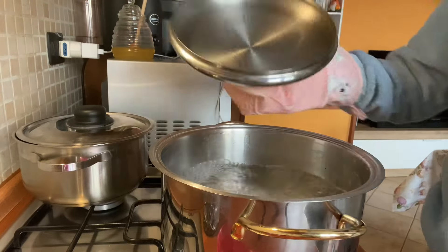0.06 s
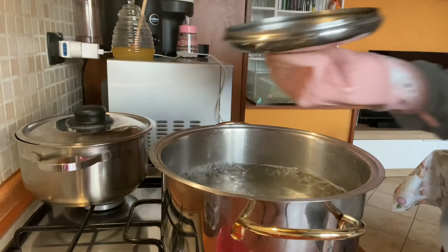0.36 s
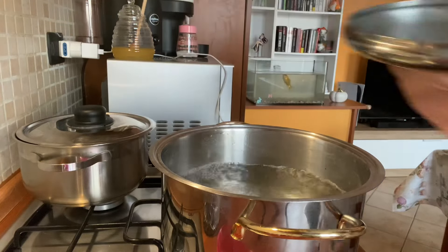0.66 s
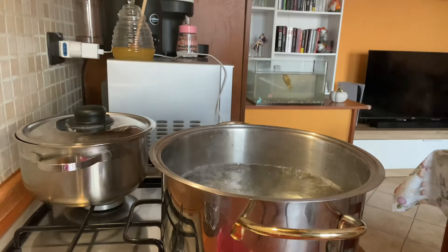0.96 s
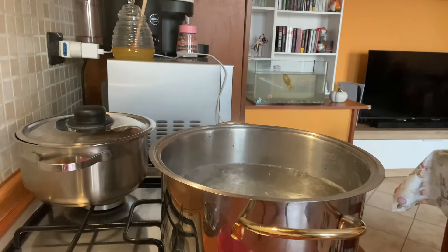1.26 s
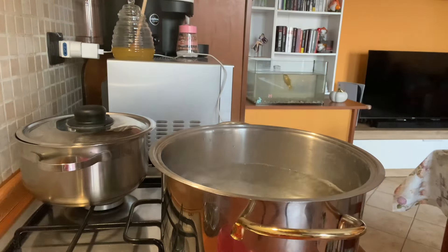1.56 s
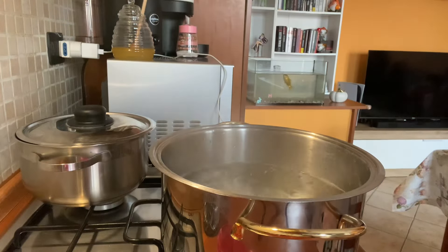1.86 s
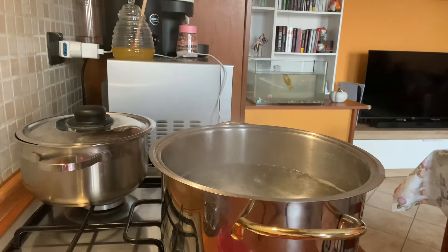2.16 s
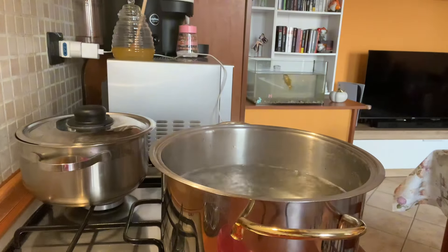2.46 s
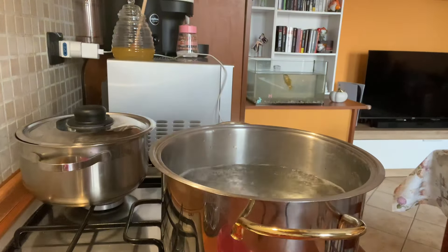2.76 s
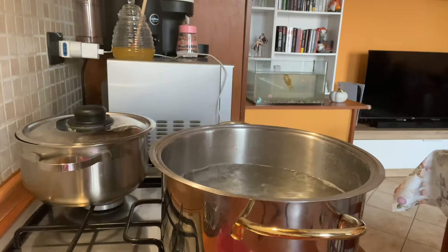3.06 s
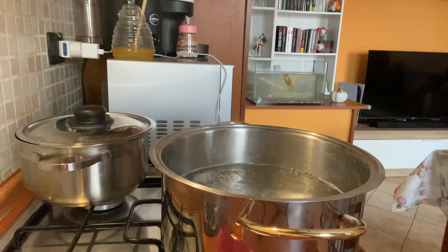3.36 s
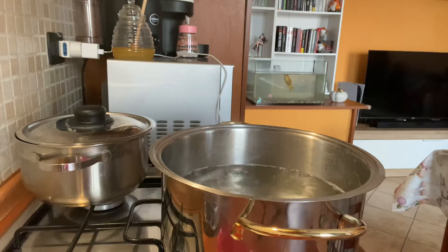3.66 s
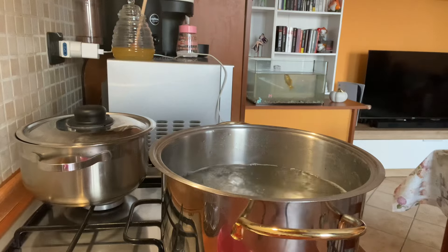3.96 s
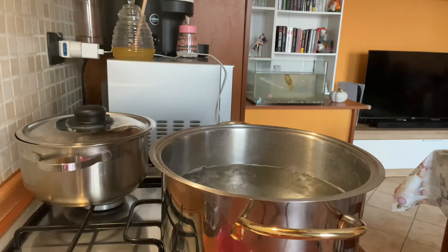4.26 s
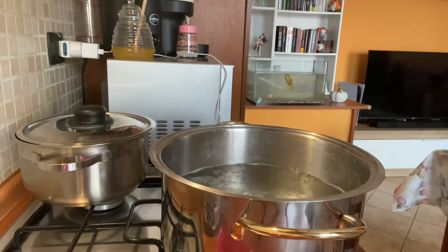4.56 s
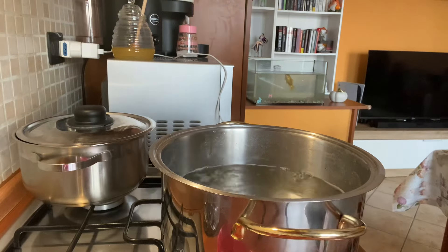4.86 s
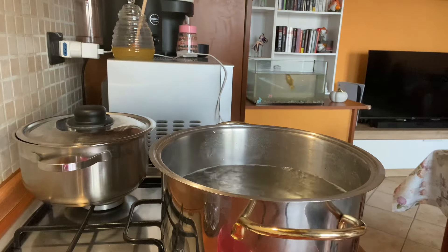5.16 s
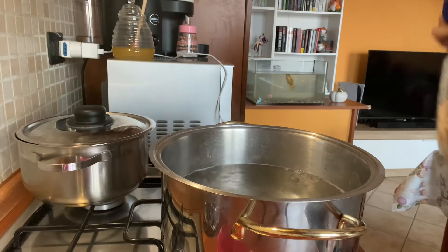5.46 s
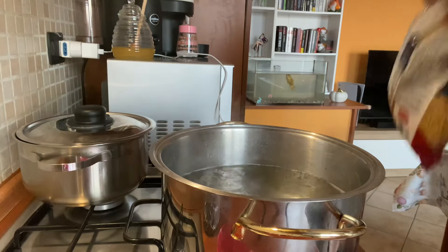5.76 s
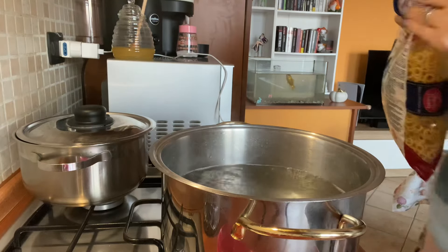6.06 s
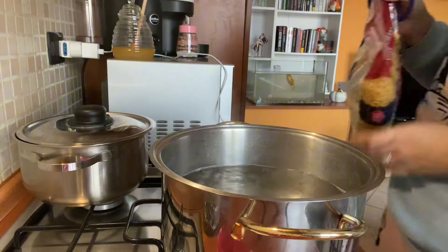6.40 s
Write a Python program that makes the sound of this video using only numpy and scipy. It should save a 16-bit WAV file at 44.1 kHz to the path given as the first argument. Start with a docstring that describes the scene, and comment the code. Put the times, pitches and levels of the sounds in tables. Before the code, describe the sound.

Close by, a metal pot lid clanks onto a kitchen counter, chatters on its rim and rings out. Several knocks and a light clink follow. Next comes the sharp crackle of a plastic bag being handled, with dry pasta shifting inside in hollow knocks and thumps. A gas flame hisses and flutters quietly throughout, heard in stereo, and the tiled room adds a short reverberation to the handling.

```python
"""First a gas burner, rumbling and hissing under a big pot, heard on a stereo microphone in a kitchen.
At 1.9 s a steel lid comes down on the counter: one clank, then it rattles flat and rings. A few things
are knocked about and the counter hums. From 3.6 s a plastic bag of dry pasta is picked up and carried
to the pot: its film crinkles and snaps, the pieces tumble inside, the air in the bag answers hollowly
and the load thumps. Tiled walls add a short reverberation to everything but the burner."""
import sys
import numpy as np
from scipy import signal
from scipy.fft import rfft, irfft, next_fast_len
from scipy.io import wavfile
from scipy.ndimage import uniform_filter1d, map_coordinates

SR = 44100
rng = np.random.default_rng(int(sys.argv[2]) if len(sys.argv) > 2 else 0)


def wav_out(sig):
    """Save sig, one row per channel (or a flat mono array), as 16-bit PCM at SR to the path in sys.argv[1]."""
    wavfile.write(sys.argv[1], SR, np.round(np.clip(np.atleast_2d(sig).T, -1, 1) * 32767).astype(np.int16))


N = 283563
TIME = np.arange(N) / SR


def amp(db):
    """Decibels to gain."""
    return 10 ** (np.asarray(db) / 20)


def unit(x):
    """Scale to rms 1."""
    return x / np.sqrt(np.mean(x ** 2) + 1e-20)


def along(points, hz):
    """Read (f/Hz, value) points on a log frequency axis."""
    freqs, values = np.transpose(points)
    return np.interp(np.log(hz + 1), np.log(freqs + 1), values)


def resonant(peaks):
    """Colour in dB of steep resonances given as (f/Hz, width/Hz, level/dB)."""
    return lambda hz: 20 * np.log10(sum(amp(db) / (1 + (2 * (hz - centre) / width) ** 4)
                                        for centre, width, db in peaks))


def wobble(rate):
    """A smooth random curve, rate knots a second."""
    return map_coordinates(rng.standard_normal(int(N * rate / SR) + 4), [TIME * rate])


def swell(t, start, hold, rise, fall):
    """Gain of a gesture: full from start for hold seconds, 20 dB per rise or fall time on either side."""
    return 10 ** (np.minimum(t - start, 0) / rise - np.maximum(t - start - hold, 0) / fall)


def filtered(x, response):
    """x times a response of frequency."""
    n = x.shape[-1]
    padded = next_fast_len(n + 2048, True)
    return irfft(rfft(x, padded) * response(np.fft.rfftfreq(padded, 1 / SR)), padded)[..., :n]


def dying(x, decay):
    """Each frequency region of x fades at its own t60."""
    t = np.arange(x.shape[-1]) / SR
    centres, t60s = np.transpose(decay)
    return sum(filtered(x, lambda hz: along(np.c_[centres, band], hz)) * amp(-60 * t / t60)
               for band, t60 in zip(np.eye(len(decay)), t60s))


def add(track, s, sound):
    """Mix a sound in at time s."""
    part = track[..., round(s * SR):][..., :sound.shape[-1]]
    part += sound[..., :part.shape[-1]]


def panned(db):
    """Gains that put the left microphone db above the right."""
    return amp([[db / 2], [-db / 2]])


def leading(x, lag):
    """A sound from one side reaches the right microphone lag seconds after the left."""
    return filtered(x, lambda hz: np.exp(-2j * np.pi * hz * np.array([[0], [lag]])))


# How alike the two microphones hear the room: f/Hz, correlation
MIC_LIKENESS = [(60, 0.95), (150, 1), (300, 0.16), (600, 0.055), (1200, 0.32), (3000, 0.2), (8000, 0.081),
                (12000, 0.041)]
def noise(colour_db, size):
    """Stereo noise of rms 1: the microphones agree in the bass and differ in the treble."""
    hz = np.fft.rfftfreq(size, 1 / SR)
    alike = np.clip(along(MIC_LIKENESS, hz), -1, 1)
    phases = np.exp(2j * np.pi * rng.random((2, len(hz))))
    mid, side = irfft(phases * amp(colour_db(hz)) * np.sqrt([1 + alike, 1 - alike]), size)
    return unit(np.array([mid + side, mid - side]))


def blow(spectrum, decay, bass_db, treble_db, bass_hz, treble_hz):
    """Dense short resonances of a struck thing: heavy contact adds bass, hard contact treble."""
    def colour(hz):
        bass = bass_db / (1 + (hz / bass_hz) ** 2)
        treble = treble_db * hz ** 2 / (hz ** 2 + treble_hz ** 2)
        return along(spectrum, hz) + bass + treble
    t = np.arange(SR // 4) / SR
    return dying(noise(colour, len(t)), decay) * (1 - np.exp(-t / 0.0026))


# Colour of the sound off the tiles: f/Hz, level/dB
TILE_COLOUR = [(150, -13), (300, -2), (700, 0), (1500, 0), (2100, -6), (3000, 0), (12000, 0)]
# Its decay: f/Hz, t60/s
TILE_DECAY = [(100, 0.39), (500, 0.63), (3000, 0.59), (12000, 0.23)]
def room(x):
    """The tiled kitchen answers 5 ms after the direct sound, mostly above the bass."""
    tail = dying(noise(lambda hz: along(TILE_COLOUR, hz), SR // 2), TILE_DECAY)
    tail = np.pad(tail, ((0, 0), (SR // 200, 0)))
    return signal.fftconvolve(x, tail / np.linalg.norm(tail[0]), axes=1)[:, :N]


# The flame under the pot: f/Hz, level/dB
FLAME_COLOUR = [(20, -34), (45, -11), (75, -7), (105, -2), (135, -10), (170, -10), (230, -17), (450, -22),
                (800, -21.5), (1400, -21), (2100, -27.5), (4300, -27.5), (7500, -26.5), (13200, -25.5),
                (16000, -40)]
# Resonances of the gas jet: f/Hz, width/Hz, boost/dB
JET_PEAKS = [(1303, 100, 6), (3400, 400, 4), (5233, 300, 5), (8452, 500, 2), (12600, 1200, 2)]
# Course of the lowest one, a faint whistle: t/s, level/dB
WHISTLE_LEVEL = [(.5, 3), (.9, -1.5)]
def stove():
    """In the background the flame flutters and gas hisses through its jet, over a low hum."""
    jet_db = lambda hz: sum(db / (1 + (2 * (hz - centre) / width) ** 2)
                            for centre, width, db in JET_PEAKS)
    flame = noise(lambda hz: along(FLAME_COLOUR, hz) + jet_db(hz), N)
    rumble = filtered(flame, lambda hz: 1 / (1 + (hz / 220) ** 4))
    flutter = amp(2 * wobble(8))
    whistle_hz, width_hz, _ = JET_PEAKS[0]
    whistle = filtered(flame, lambda hz: 1 / (1 + (2 * (hz - whistle_hz) / width_hz) ** 2))
    waver = amp(np.interp(TIME, *np.transpose(WHISTLE_LEVEL)) + 2 * wobble(2.5))
    hum = amp(-55 + 3.5 * wobble(5)) * np.sin(2 * np.pi * 102 * TIME + wobble(6))
    return amp(-47) * (flame + rumble * (flutter - 1) + whistle * (waver - 1)) + hum


# Knocks, and faint lead-ins just before two of them:
# t/s, level/dB, extra bass/dB, extra treble/dB, low hum/dB, high hum/dB
KNOCKS_AND_LEAD_INS = [(2.517, -28, 9, -7, -47, -52), (2.55, -29.5, -6, -18, -53, -33.5),
                       (3.125, -31, 2, -12, -60, -49), (3.161, -26, -8, -5, -60, -55),
                       (3.167, -11, -4.5, -17.5, -42, -25), (3.175, -18.5, 3, -19, -28, -33),
                       (3.202, -22, -4, -16, -50, -46), (3.217, -16, 9, -30, -26, -21),
                       (3.246, -29.5, -4, 17, -45, -48), (3.256, -44, 4, -20, -29, -30),
                       (3.345, -24.5, 17, -32, -49, -36), (3.411, -31, 0, -28, -38.5, -76.5),
                       (3.456, -20, 3.5, -5.5, -48.5, -36), (3.582, -19, -4, -5, -45, -48),
                       (3.588, -9, -10, 3.5, -43, -46), (3.675, -27, -9, -4, -60, -55),
                       (3.696, -12, -13.5, -19, -50, -36), (5.808, -9, 9, 15, -49, -44),
                       (5.817, -11, 14, 5, -29, -31), (6.009, -22, -10, -14, -42, -44)]
# Colour of a knock: f/Hz, level/dB
KNOCK_COLOUR = [(40, -18), (120, -5.5), (200, -8.5), (300, 3.5), (680, 5), (1200, -1), (2000, 4.5),
                (3500, -3), (5500, -10.5), (9000, -11), (16000, -109)]
# Its decay: f/Hz, t60/s
KNOCK_T60 = [(100, 0.2), (400, 0.05), (1500, 0.028), (9000, 0.048)]
# The counter's low hum, then the pair that makes its high hum: f/Hz, t60/s
COUNTER_MODES = [(157, 0.36), (298, 0.049), (393, 0.1)]
def knocks():
    """Things are moved about on the counter; heavy ones leave it humming."""
    out, t = np.zeros((2, N)), np.arange(SR // 2) / SR
    onset = 1 - np.exp(-t / 0.0019)
    low, second, third = [onset * amp(-60 * t / t60) * np.sin(2 * np.pi * hz * t)
                          for hz, t60 in COUNTER_MODES]
    high = 0.21 * second + 1.08 * third
    for s, db, bass_db, treble_db, low_db, high_db in KNOCKS_AND_LEAD_INS:
        knock = blow(KNOCK_COLOUR, KNOCK_T60, bass_db, treble_db, bass_hz=597, treble_hz=2190)
        add(out, s, amp(db) * knock)
        add(out, s, amp(low_db) * low + amp(high_db) * high)
    return out


# Steelware on the counter: f/Hz, relative level/dB, t60/s
STEELWARE_MODES = [(1940, 9, 0.14), (2810, -4, .25), (3500, -6, .3), (4000, -13, 0.27)]
def clink(at_s=3.589, level_db=-38):
    """One hard knock catches a piece of steelware, which rings briefly."""
    out, t = np.zeros((2, N)), np.arange(SR // 2) / SR
    for hz, db, t60 in STEELWARE_MODES:
        tone = np.sin(2 * np.pi * (hz * t + rng.random((2, 1))))
        add(out, at_s, amp(level_db + db - 60 * t / t60) * tone)
    return out


# Modes of the lid and the board under it: f/Hz, relative level/dB, t60/s
LID_MODES = [(48.6, -14.5, 0.85), (100, -12.5, 0.78), (153, -6.5, 1), (181, -11.5, 1), (215, -19, 0.3),
             (258, -2.5, 0.15), (282, -4.5, 0.25), (412, -19, 0.32), (541, -4.5, 0.5), (556, -15, .3),
             (712, -5, 0.1), (755, -10, 0.13), (1030, -29, .28), (1225, -16, 0.13), (1295, -18, 0.18),
             (1880, -27, .35), (1965, -18, 0.2), (2056, -8, 0.16), (2222, -16, 0.33), (2458, -30, .55),
             (2472, -19.5, 0.8), (2676, -26, 0.52), (2837, -28, 0.78), (2929, -29, 0.7), (2998, -25, .3),
             (3456, -32, 0.68), (3569, -33, .52), (3840, -33, 0.75), (3908, -29, .33), (4500, -27.5, 0.68),
             (4705, -32, 0.55), (5922, -29, 0.43)]
def lid_ring(held, free, mitt_db=-16, mitt_hz=450):
    """Contact energy feeds each mode; while the lid is held, a mitt soaks up most, above all the highs."""
    ring, t = np.zeros((2, len(free))), np.arange(len(free)) / SR
    for hz, db, t60 in LID_MODES:
        pushes = free + held * amp(mitt_db) ** 2 / (1 + (hz / mitt_hz) ** 2)
        energy = signal.lfilter([1], [1, -amp(-60 / t60 / SR) ** 2], pushes + 1e-20)
        swing = uniform_filter1d(np.sqrt(energy), size=200)
        waver = amp(2 * (hz > 1000) * wobble(16)[:len(t)])  # rocking makes the high modes waver
        lag = np.array([[0], [rng.uniform(-0.00017, .0001)]])  # each mode arrives from its own side
        jolts = np.cumsum(rng.standard_normal(len(t)) * np.sqrt(pushes / energy))  # from each contact
        phase = 2 * np.pi * hz * (t - lag) + uniform_filter1d(jolts, size=200)
        ring += amp(db) * swing * waver * np.sin(phase)
    return ring


# The lid hits the counter: t/s, level/dB, extra bass/dB, extra treble/dB
LID_HITS = [(1.919, -3, -13, -9.5), (1.925, -11, 15, -13), (2.109, -17, 12, -22), (2.121, -11, -1, -1),
            (2.132, -6.5, -31, -13.5), (2.14, -11, 15, -14), (2.167, -7.5, 6, -10), (2.198, -8, -31, -18),
            (2.205, -8, -5, -15), (2.232, -11.5, 1, -10), (2.246, -10, 5, -6), (2.28, -14, 2, -9)]
# Colour of a hit: f/Hz, level/dB
CLANK_COLOUR = [(25, -28), (50, -13), (85, -8.5), (160, -12), (265, 3.5), (370, 1), (480, 1), (690, 0),
                (950, -15), (1250, -10), (1650, -23), (2030, -7.5), (2500, -22.5), (3200, -26), (6500, -26),
                (12800, -34.5), (16000, -55)]
# Its decay: f/Hz, t60/s
CLANK_T60 = [(80, 0.84), (300, 0.13), (800, 0.049), (2200, 0.087), (10000, 0.2)]
def lid(let_go_s=2.1, chatter_per_s=68):
    """The lid clanks while the mitt still damps it, then is let go, chatters on its rim and rings."""
    def contact(bass_db, treble_db):
        return blow(CLANK_COLOUR, CLANK_T60, bass_db, treble_db, bass_hz=404, treble_hz=2500)
    out, first_s = np.zeros((2, N)), LID_HITS[0][0]
    held, free = np.zeros((2, 3 * SR // 2))
    for s, db, bass_db, treble_db in LID_HITS:
        add(out, s, amp(db) * contact(bass_db, treble_db))
        pushes = held if s < let_go_s else free
        pushes[round((s - first_s) * SR)] += amp(db) ** 2
    for k, jitter in enumerate(rng.random(size=14)):  # light rim contacts between the hits
        s = let_go_s + (k + jitter / 2) / chatter_per_s
        force = amp(-16.5) * swell(s, start=2.135, hold=0.069, rise=0.084, fall=0.15)
        add(out, s, force * contact(bass_db=-38, treble_db=-8))
    add(out, first_s, amp(-8) * lid_ring(held, free))
    return out


# The bag nears the pot, moving from the left towards the centre: t/s, lag/s
BAG_PATH = [(5.1, .00028), (6.3, 0.000082)]
def bag_lag(t):
    """Seconds by which the left microphone hears the bag first."""
    return np.interp(t, *np.transpose(BAG_PATH))


# The hand's steady work on the bag: t/s, effort/dB
HANDLING = [(3.61, -55), (3.7, -60), (3.78, -54), (3.89, -41), (3.98, -33.5), (4.25, -32.5), (4.52, -28.5),
            (4.68, -44), (4.735, -40.5), (4.80, -34.5), (4.84, -41.5), (4.91, -37), (5.03, -40),
            (5.11, -40), (5.28, -37), (5.33, -38.5), (5.40, -42), (5.47, -39), (5.52, -38), (5.57, -32.5),
            (5.67, -32.5), (5.74, -28), (5.85, -33.5), (6.03, -52.5), (6.31, -49.5), (6.43, -47.5)]
def effort(t):
    """Gain of the steady handling at times t, silent before the bag is touched."""
    return amp(np.interp(t, *np.transpose(HANDLING), left=-120))


def grains(rate, pitch_hz, cycles, spread_db, pitch_spread=0.8, size=96):
    """Random ticks from the bag, each a damped sine of its own pitch, strength and direction; rms 1."""
    count, k = int(rate * N / SR), np.arange(size)
    pitch, strength, angle, balance = rng.standard_normal((count, 4)).T[..., None]
    start = rng.integers(SR // 100, N, count)[:, None]
    turns = np.clip(pitch_hz * np.exp(pitch_spread * pitch), 200, SR / 3) * k / SR
    ticks = amp(spread_db * np.minimum(strength, 2)) * np.sin(2 * np.pi * turns) * np.exp(-turns / cycles)
    delay = (SR * bag_lag(start / SR) * (1 + 0.37 * angle)).astype(int)
    mics = [(start + k, ticks), (start + k + delay, ticks * amp(2 * balance))]
    return np.array([unit(np.bincount(at.ravel(), heard.ravel(), N)[:N]) for at, heard in mics])


def scattered(x, t60, share=.7):
    """Part of each tick bounces around in the folds of the bag, which keep changing shape."""
    out, t = x.copy(), np.arange(SR // 20) / SR
    for start in range(0, N, len(t)):
        tail = rng.standard_normal((2, len(t))) * amp(-60 * t / t60)
        tail /= np.linalg.norm(tail[0])
        add(out, start / SR, share * signal.fftconvolve(x[:, start:start + len(t)], tail, axes=1))
    return out


# Resonances of the gripped film: f/Hz, width/Hz, level/dB
GRIP_PEAKS = [(1930, 70, -7), (2295, 110, 0), (2480, 200, -7), (2810, 60, -5)]
def rub():
    """Under a tighter grip the film scrapes over itself and sings in a few narrow, rough bands."""
    scrape = noise(resonant(GRIP_PEAKS), N) * amp(-36 + 2.5 * wobble(50))
    return scrape * swell(TIME, start=4.75, hold=.22, rise=.04, fall=.15)


# Clumps of pasta drop against the bag: t/s, level/dB, f/Hz
PASTA_DROPS = [(4.208, -24, 1024), (4.305, -21, 724), (4.505, -21, 475), (4.565, -27, 535), (4.6, -29, 556),
               (4.795, -25, 480), (4.866, -33, 486), (4.966, -24, 477), (4.995, -22, 478),
               (5.088, -22, 492), (5.142, -21, 475), (5.235, -33, 510), (5.275, -23.5, 457),
               (5.305, -26, 502), (5.398, -26.5, 520), (5.481, -34, 527), (5.555, -22.5, 517),
               (5.74, -31, 507), (5.815, -18, 550), (6.262, -29, 522), (6.332, -22.5, 518),
               (6.378, -39, 504)]
def slumps(width_hz=200, t60=.07):
    """A clump of pasta lands and the bag answers with a short hollow knock."""
    out, t = np.zeros((2, N)), np.arange(SR // 6) / SR
    onset = 1 - np.exp(-t / 0.0012)
    for s, db, hz in PASTA_DROPS:
        hollow = .5 * noise(resonant([(hz, width_hz, 0)]), len(t))
        add(out, s, amp(db - 60 * t / t60) * onset * (np.sin(2 * np.pi * hz * t) + hollow))
    return out


# Dry pasta shifting in the bag: f/Hz, level/dB
PASTA_COLOUR = [(250, -19), (340, -17), (420, -7), (540, -3), (690, -5), (820, -8), (1000, -4.5),
                (1150, -4.5), (1420, 0), (1800, -3.5), (2400, -7), (3500, -15), (6000, -40)]
def pasta(clumps):
    """Pieces tumble in clumps, and single ones clack and ring briefly as they meet."""
    ticks = grains(rate=1500, pitch_hz=1500, cycles=.5, spread_db=3) * amp(1.5 * clumps)
    tumble = unit(filtered(scattered(ticks, t60=.05), lambda hz: amp(along(PASTA_COLOUR, hz))))
    clacks = grains(rate=90, pitch_hz=1300, cycles=5, spread_db=2.5, pitch_spread=.35, size=900)
    return amp(-1) * tumble + amp(-7) * clacks


# The plastic film, crinkling or snapping: f/Hz, level/dB
FILM_COLOUR = [(400, -30), (900, -7), (1300, -2.5), (1750, -2.5), (2350, -.5), (3700, -3), (4900, -.5),
               (6500, -2), (8300, -.5), (13000, -3), (14300, -9), (15000, -24), (16000, -32)]
def crinkle(clumps, taut):
    """The film gives off tiny ticks in clumps, more unevenly when taut."""
    ticks = grains(rate=3000, pitch_hz=7000, cycles=.5, spread_db=4.5) * amp((1.2 + .9 * taut) * clumps)
    return unit(filtered(scattered(ticks, t60=.03), lambda hz: amp(along(FILM_COLOUR, hz))))


# Big creases buckle: t/s, level/dB, left over right/dB, length/s
CREASES = [(3.933, -12.5, 6, 0.011), (3.9655, -11, 6, 0.006), (4.089, -6, 5, 0.0064), (4.135, -13, 5, .005),
           (4.207, -5.5, 1, 0.0058), (4.253, -6.5, 3, 0.0054), (4.32, -6, 5, .005), (4.384, -4, 4, .014),
           (4.564, -4.5, 2, 0.0038), (4.703, -11, 10, 0.0021), (4.716, -23, 3, .003),
           (4.743, -13, 5, 0.0033), (4.759, -10, 7, 0.0023), (4.792, -10, 9, 0.0073),
           (4.812, -11, 4, 0.0033), (4.819, -6, 4, 0.0025), (4.859, -7, 7, 0.0061),
           (4.868, 0.5, 9.5, 0.007), (4.887, -1, 0, 0.0022), (4.907, -3.5, 0, 0.017),
           (4.959, -14, 3, 0.0042), (4.971, -0.5, 2, 0.0062), (4.994, -3, 3, 0.0045),
           (5.044, -6, 0, 0.0049), (5.067, -16, 0, 0.0031), (5.087, -2.5, 0, 0.0051),
           (5.129, -1, 1.5, 0.0017), (5.141, -4.5, 0, .005), (5.163, 0, 1, 0.0093),
           (5.194, -6, -12, 0.0062), (5.242, -2, -5, 0.0044), (5.31, -8, -3, 0.0019), (5.325, -16, 0, .003),
           (5.348, -22, 0, 0.0035), (5.364, -8.5, 2, 0.0027), (5.397, -12, -3, 0.0018),
           (5.417, -10, 0, 0.0037), (5.4317, -11, 3, 0.0017), (5.453, -17, -2, 0.0037),
           (5.48, -7.5, -1, 0.0026), (5.509, -16, 2, 0.0023), (5.5323, -7.5, 0, 0.0037),
           (5.548, -8, 0, 0.0037), (5.619, -3, 3, 0.005), (5.653, 4.5, -1.5, 0.0048),
           (5.871, -6.5, -3, .005), (5.955, -12.5, -2, 0.01), (6.064, -30, -4, 0.0024),
           (6.136, -17.5, 0, 0.0058), (6.243, -35, 3, .002), (6.261, -21, 0, 0.0029),
           (6.359, -32, 3, 0.0017), (6.4098, -8.5, 5, 0.0097)]
def snaps(small_per_s=3.8):
    """A crease buckles in a quick run of cracks, then the folds shiver; small ones follow the effort."""
    out, t = np.zeros((2, N)), np.arange(-SR // 100, SR // 10) / SR
    crack = lambda start: amp(-60 * abs(t - start) / 0.001) * (t >= start)
    begin, end = HANDLING[0][0], HANDLING[-1][0]
    times = rng.uniform(begin, end, size=int(small_per_s * (end - begin)))
    big = [(s, amp(db), pan_db, length) for s, db, pan_db, length in CREASES]
    small = [(s, amp(1) * effort(s), 0, .003) for s in times]
    for s, gain, pan_db, length in big + small:
        pitch_hz = 6000 * np.exp(.5 * rng.standard_normal())
        colour = lambda hz: along(FILM_COLOUR, hz) + 3 / (1 + ((hz - pitch_hz) / 4000) ** 2)
        later_energy = sum(crack(start) ** 2 / 2 for start in rng.uniform(0, length, size=4))
        run = 1.5 * np.tanh(noise(colour, len(t))[0]) * np.sqrt(crack(0) ** 2 + later_energy)
        direct = leading(run, lag=bag_lag(s) * rng.uniform(.7, 1.3))
        folds = noise(colour, len(t)) * amp(-12 - 60 * abs(t) / .04) * (t >= 0)
        add(out, s + t[0], gain * panned(pan_db) * (direct + folds) / 2)
    return out


# The bag is jerked and its load slides: t/s, length/s, effort/dB, thump over effort/dB
BAG_JERKS = [(4.378, 0.011, -44.5, 12), (4.481, 0.055, -35, -1), (4.857, 0.031, -29, -6),
             (4.965, 0.009, -37, -1), (5.149, 0.1, -29, -23), (5.627, 0.025, -37, -6),
             (5.721, 0.032, -34.5, -17), (5.797, 0.024, -26, -7)]
# Resonances of the air in the bag: f/Hz, width/Hz, level/dB
BAG_AIR = [(435, 65, 0), (535, 95, 0), (660, 60, -8), (930, 200, -8)]
# Thump of the load: f/Hz, level/dB
THUMP_COLOUR = [(30, -49), (65, -33), (95, 1), (130, -8), (170, 2.5), (220, -7.5), (275, 3), (335, -19),
                (500, -47)]
def bag(taut_s=4.7):
    """One effort drives it all: film crinkles, pasta tumbles, the hollow answers and the load thumps."""
    steady = effort(TIME)
    drive, heave = steady, amp(-8) * steady
    for s, length, db, thump_db in BAG_JERKS:
        jerk = amp(db) * swell(TIME, s, length, rise=0.0093, fall=0.054)
        drive = drive + jerk
        heave = heave + amp(thump_db) * jerk
    clumps, taut = np.minimum(wobble(70), 1.6), TIME > taut_s
    film = amp(4) * panned(db=0.5) * crinkle(clumps, taut)
    pieces = amp(-3 * taut) * pasta(clumps)  # packed tighter in the hanging bag, they sound less
    hollow = noise(resonant(BAG_AIR), N) * amp(-3.5 - 4.5 * ~taut + clumps)  # weaker while slack
    thump = noise(lambda hz: along(THUMP_COLOUR, hz), N) * amp(3.4 * wobble(25))
    return drive * (film + pieces + hollow) + heave * thump


def scene():
    """The kitchen at the microphone: bag and lid sound close, the knocks farther off with more room."""
    clank = lid()
    bumps = knocks() + clink()
    rustle = bag() + snaps() + slumps() + rub()
    reverb = room(amp(-13) * clank + amp(-7) * bumps + amp(-15) * rustle)
    return clank + bumps + rustle + reverb + stove()


# Mismatch of the two microphones: f/Hz, left over right/dB
MIC_BALANCE = [(60, 0), (150, -5), (380, 0), (950, -1), (2380, 1), (5980, -1), (15000, -1)]
# The stereo image, narrow near 8.5 and 12 kHz, very wide around 10.5 kHz: f/Hz, side over mid/dB
STEREO_WIDTH = [(5000, -0.5), (7000, -1.5), (8500, -11.5), (9500, 0.5), (10100, 26.5), (10800, 25.5),
                (11300, 5.5), (12300, -10), (16000, 14)]
def record(dry, low_cut_hz=33, top_hz=16100):
    """Two slightly unequal microphones; then the image narrows and widens in the treble; band limits."""
    balance = lambda hz: amp(np.outer([.5, -.5], along(MIC_BALANCE, hz)))
    angle = lambda hz: np.arctan(amp(along(STEREO_WIDTH, hz)))
    width = lambda hz: np.array([np.cos(angle(hz)), np.sin(angle(hz))])
    band = lambda hz: (hz < top_hz) * hz ** 6 / (hz ** 6 + low_cut_hz ** 6)
    left, right = filtered(dry, balance)
    mid, side = filtered(np.array([left + right, left - right]) / np.sqrt(2), width)
    return filtered(np.array([mid + side, mid - side]), band)


dry = scene()
out = record(dry)
wav_out(out)
```